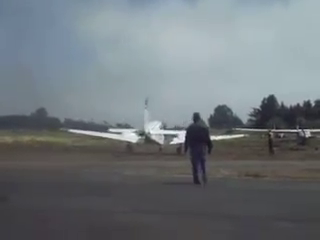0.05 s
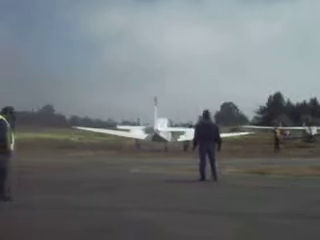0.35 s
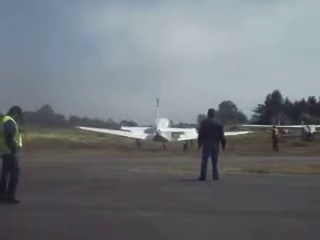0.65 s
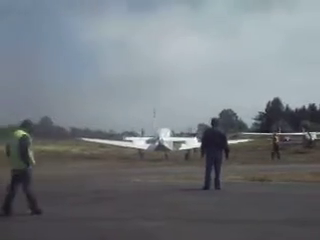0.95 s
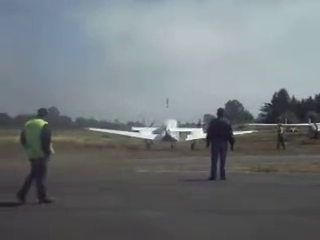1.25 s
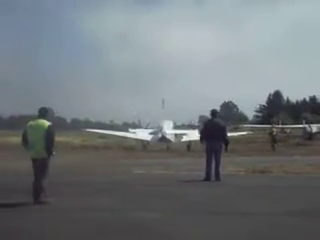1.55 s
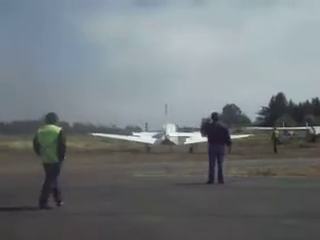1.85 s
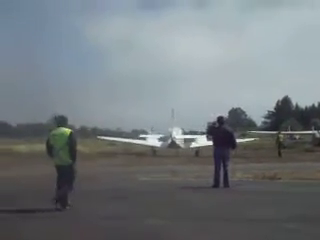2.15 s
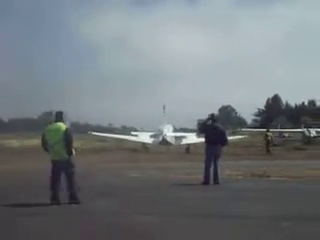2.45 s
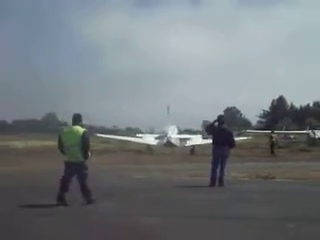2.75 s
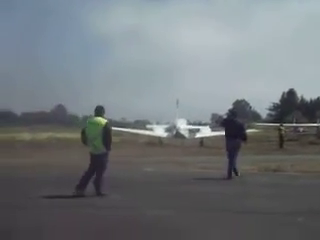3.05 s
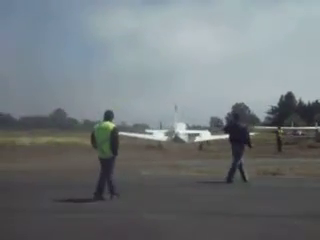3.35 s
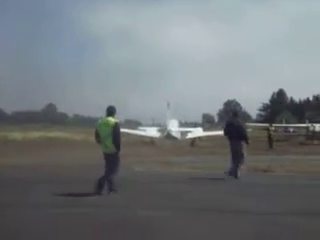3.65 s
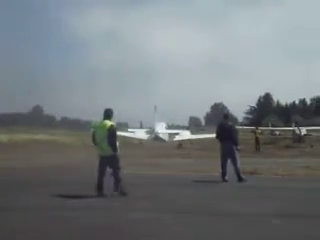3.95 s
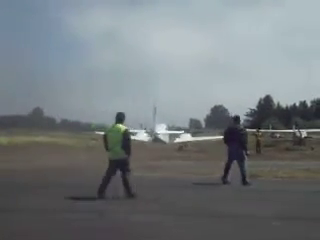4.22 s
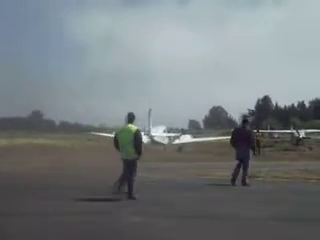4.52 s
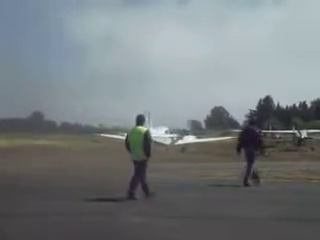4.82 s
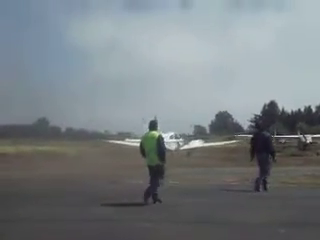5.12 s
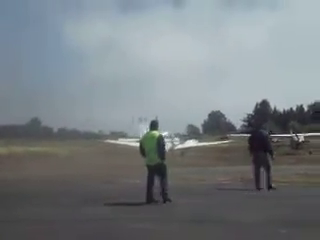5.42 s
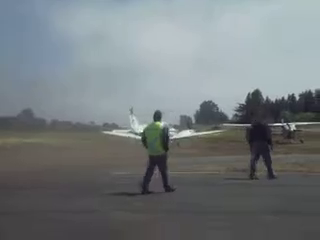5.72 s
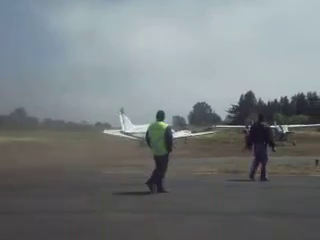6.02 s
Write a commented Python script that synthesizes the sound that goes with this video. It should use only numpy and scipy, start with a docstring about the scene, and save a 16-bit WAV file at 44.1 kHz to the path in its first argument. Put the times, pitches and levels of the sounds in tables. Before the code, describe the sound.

A small twin-engine propeller plane taxis on an airfield apron, heard from behind. Its low, raspy drone first beats in a slow throb. Then one engine climbs in pitch while the other sinks and weakens, and the throb quickens into a flutter. Throughout, propeller wind buffets the small microphone with rumble and short hissing gusts, and blown grit now and then ticks on its case.

```python
"""Two piston aircraft engines, heard from behind in the propeller wash as the plane turns away on an apron.
Nearly equal in speed, they first beat in a slow throb; then the left is opened up and the right
throttled back, so the difference frequency rises and the throb quickens to a flutter.
The exhausts bark and rasp, the turbulent wash buffets a small microphone, and blown grit ticks
on its case, which resonates near 3 kHz."""
import sys
import numpy as np
from scipy import signal
from scipy.fft import rfft, irfft, next_fast_len
from scipy.io import wavfile
from scipy.ndimage import uniform_filter1d

SR = 44100
rng = np.random.default_rng(int(sys.argv[2]) if len(sys.argv) > 2 else 0)


def transcribe(u):
    """Save the signal u as a 16-bit wav file named by the first command-line argument.

    u: samples, shape (n,) or (channels, n), limited to [-1, 1]; the rate is SR.
    q: integer samples, one column per channel.
    """
    v = np.clip(np.atleast_2d(u).T, -1, 1)
    q = np.round(v * 32767).astype(np.int16)
    wavfile.write(sys.argv[1], SR, q)


N = 272538
TIME = np.arange(N) / SR

# Strength of the exhausts towards the microphone. Each row: time in seconds, gain in dB.
EXHAUST_STRENGTH = [(0, -6), (.27, 1.5), (.6, 1.3), (1.3, 2.7), (1.85, 1), (2.3, -3), (4.0, -2.5),
                    (5.0, -2.5), (5.55, 3), (6.18, 2.5)]


def left_engine():
    """The engine that is opened up: pitch rises with speed, and the blade tone swells as the plane turns."""
    # Each row: time in seconds, firing and blade rate in Hz.
    speed = [(0.0, 66.43), (0.48, 65.62), (2.41, 66.08), (3.05, 70.62), (3.2, 70.72), (3.61, 72.94),
             (4.58, 76.37), (4.97, 80.82), (6.18, 91.02)]
    # Blade tone, octave, overtones. Each row: base level in dB, slope in dB per octave of speed.
    laws = [(-12, 4), (-23.5, -5), (-35, -1)]
    # Each row: multiple of the firing rate, relative level in dB.
    overtones = [(1.5, -7.5), (2.5, -5.5), (3, 0), (4, -12), (4.5, -14), (5, -15.5), (6, -13.5), (7, -22)]
    # Each row: time in seconds, gain of the blade tone in dB.
    swell = [(0, 5), (1.6, -4), (2.5, 0), (2.92, -3), (3.4, 4.5), (4.75, 3), (5.12, -6.5), (5.65, 3.5),
             (6.18, 2)]
    return engine(speed, laws, overtones, start_turn=-.06, swell_db=in_time(swell))


def right_engine():
    """The engine that is throttled back: its fundamental falls and weakens as it slows."""
    # Each row: time in seconds, firing and blade rate in Hz.
    speed = [(0.0, 63.95), (1.4, 64.02), (1.73, 63.23), (2.68, 53.46), (2.8, 52.79), (4.08, 49.18),
             (4.39, 49.82), (5.42, 47.3), (6.18, 48.37)]
    # Blade tone, octave, overtones. Each row: base level in dB, slope in dB per octave of speed.
    laws = [(-11, 29), (-19, 8.5), (-29.5, 1.5)]
    # Each row: multiple of the firing rate, relative level in dB.
    overtones = [(.5, -6.5), (1.5, -9), (3, 2), (4, -16.5), (4.5, -7.5), (5, -11), (6, -18.5), (7, -18),
                 (9, -22.5)]
    return engine(speed, laws, overtones, start_turn=.035, swell_db=0)


def engine(speed, laws, overtones, start_turn, swell_db):
    """Phase is the integral of frequency: one phase times the drone, firing pulses and gas noise."""
    hz, taxi_hz = in_time(speed), 65
    turns = start_turn + np.cumsum(hz) / SR
    octaves = np.log2(hz / taxi_hz)
    tone_db, octave_db, upper_db = [db + slope * octaves for db, slope in laws]
    lift_db = 0.47 * in_time(EXHAUST_STRENGTH)   # harmonics share in the exhausts' swing
    tilt_db = 2 * octaves   # faster blades have stronger overtones
    tones = drone(turns, tone_db + swell_db, octave_db + lift_db, upper_db + lift_db, tilt_db, overtones)
    return np.array([tones, firings(turns), puffs(turns)])


def drone(turns, tone_db, octave_db, upper_db, tilt_db, overtones):
    """Blades and firings share one harmonic series; uneven cylinders add half orders."""
    out = from_db(tone_db) * np.sin(2 * np.pi * turns) + from_db(octave_db) * np.sin(4 * np.pi * turns)
    for multiple, db in overtones:
        fading_db = 3 * drift(1.5)   # turbulent air makes each overtone come and go
        amplitude = from_db(upper_db + db + tilt_db * multiple + fading_db)
        out += amplitude * np.sin(2 * np.pi * multiple * turns)
    return np.sqrt(2) * out


def firings(turns, cylinder_db=-3.0, scatter_db=-1.3):
    """An impulse train, one pulse a firing: four cylinders of unequal strength, no two firings alike."""
    at = np.flatnonzero(np.diff(np.floor(turns)) > 0)
    cylinders = np.array([1, -1, 0, -.5])[np.arange(len(at)) % 4]
    pulses = np.zeros(N)
    pulses[at] = from_db(cylinder_db * cylinders + scatter_db * rng.standard_normal(len(at)))
    return rms_one(pulses)


def puffs(turns, depth_db=2.5, second_db=1.0, ragged_db=2.5):
    """Amplitude-modulated noise: turbulent gas puffs out at every firing, and more weakly between."""
    swell_db = depth_db * np.cos(2 * np.pi * turns) + second_db * np.cos(4 * np.pi * turns)
    return rms_one(rng.standard_normal(N) * from_db(swell_db + ragged_db * drift(120)))


def exhaust(pulses, gas, surge_db):
    """Source and filter: firings and gas drive a low bark and a middle rush; gas alone rasps on top."""
    # Three spectra. Each row: frequency in Hz, relative spectral density in dB.
    bark_spectrum = [(50, -17.5), (90, -11), (150, 5), (220, -0.5), (310, -7), (450, -11), (600, -21.5),
                     (900, -39.5)]
    rush_spectrum = [(300, -28), (550, -3), (750, 4), (1080, 8), (1350, 1), (1650, 0), (2000, -18.5)]
    rasp_spectrum = [(1900, -11.5), (2300, -5.5), (2600, 1), (2850, 3.5), (3100, -1), (3350, -8.5),
                     (3900, -13), (4400, -19.5), (5150, -19.5), (5600, -29.5), (6100, -50.5), (6800, -71.5)]
    strength_db = in_time(EXHAUST_STRENGTH)
    # The upper bands fade as the aircraft rolls away.
    rush_db = -34 + .55 * strength_db - 0.4948 * TIME
    rasp_db = -32.5 + .2 * strength_db - 0.29 * TIME
    flicker_db = 0.98 * drift(16)
    bark = from_db(-24 + strength_db) * coloured(gas + from_db(-8) * pulses, bark_spectrum)
    rush = from_db(rush_db) * coloured(gas + from_db(-11) * pulses, rush_spectrum)
    rasp = from_db(rasp_db + surge_db + flicker_db) * coloured(gas, rasp_spectrum)
    return bark + rush + rasp


def wash(rumble_rise_db, hiss_rise_db):
    """Turbulent pressure buffets the microphone, harder as power comes on, and hisses in surges."""
    # Two spectra. Each row: frequency in Hz, relative spectral density in dB.
    buffet_spectrum = [(5, -9), (18, -5.5), (35, -2), (60, -4.5), (100, -3.5), (200, -25)]
    hiss_spectrum = [(900, -1), (1500, 3.5), (2300, 4), (3100, 1), (3900, -25.5), (5200, -23),
                     (6000, -40.5), (6700, -65.5)]
    rumble = coloured(rng.standard_normal(N) * from_db(2 * drift(22)), buffet_spectrum)
    hiss = coloured(rng.standard_normal(N), hiss_spectrum)
    rumble_db = -21 + 0.34 * TIME + rumble_rise_db
    return from_db(rumble_db) * rumble + from_db(-44 + hiss_rise_db) * hiss


def gusts():
    """Gusts and lulls modulate the rumble, hiss and rasp, each along a Gaussian curve in dB."""
    # Each row: centre in seconds, half length in seconds, rises of rumble, hiss and rasp in dB.
    surges = [(.04, 0.087, -12, 17.5, 1.5), (.32, .14, -3.5, -7, 1.5), (1.149, 0.079, -9, -2, 3),
              (1.472, .19, 2, 14, 2), (2.98, .13, 3.5, 13, 2), (4.95, 0.11, 5, 1.5, 2),
              (5.534, 0.14, 6.5, 1.5, 1)]
    return sum(np.outer(rises_db, np.exp(-((TIME - s) / half_s) ** 2)) for s, half_s, *rises_db in surges)


def grit(gain_db=5.5, swell_s=0.00068):
    """Impact excitation: each grain scrapes the case and rings its damped modes for a few cycles."""
    # Each row: start in seconds, relative level in dB, ring pitch in Hz, scrape against ring in dB.
    grains = [(.671, -14, 2700, -41), (.762, -15.5, 2740, -21), (.826, -15, 2700, -36),
              (1.667, -11.5, 2737, -33), (2.0463, -1.5, 2970, -10.5), (2.180, -18, 2820, -21),
              (2.307, -17.5, 2850, -18), (3.188, -18, 3000, -31), (3.206, -13.5, 2930, -20),
              (3.2767, -5.5, 3060, -29), (3.468, -25, 2860, -26), (3.704, -15, 2730, -11),
              (5.298, -1.5, 3050, -13)]
    # Each row: ratio of a mode to the ring pitch, relative level in dB.
    case_modes = [(.55, -26), (1, -2.5), (1.72, -31.5)]
    # Each row: frequency in Hz, relative spectral density in dB.
    scrape_spectrum = [(1000, -10), (1650, 17.5), (2200, 7), (3000, -2.5), (4200, -7), (5200, 3.5),
                       (6200, -39.5)]
    out, t = np.zeros(N), TIME[:SR // 50]
    noise = coloured(rng.standard_normal(N), scrape_spectrum)
    scrapes = noise[:len(grains) * len(t)].reshape(len(grains), -1)
    envelope = (t / swell_s) ** 2 * np.exp(-t / swell_s)
    for (s, db, hz, scrape_db), scrape in zip(grains, scrapes):
        ring = sum(from_db(mode_db) * np.sin(2 * np.pi * ratio * hz * t) for ratio, mode_db in case_modes)
        add(out, s, from_db(db + gain_db) * envelope * (ring + from_db(scrape_db) * scrape))
    return out


def limiter(x, ceiling, release_db_per_s, attack_s):
    """Gain control: the level ducks when the 1 ms average passes the ceiling, then creeps back."""
    crest = np.abs(uniform_filter1d(x, size=SR // 1000, axis=-1))
    over_db = np.maximum(20 * np.log10(crest / ceiling + 1e-9), 0)
    release_db = release_db_per_s * TIME
    held_db = np.maximum.accumulate(over_db + release_db, axis=-1) - release_db
    pole = np.exp(-1 / (attack_s * SR))
    return x * from_db(-signal.lfilter([1 - pole], [1, -pole], held_db))


def overload(x, top, hardness):
    """Saturation: crests flatten at the top, with a narrow rounded knee."""
    return x / (1 + np.abs(x / top) ** hardness) ** (1 / hardness)


def coloured(x, spectrum):
    """Spectral shaping to unit rms, falling 24 dB per octave beyond the spectrum's ends."""
    hz, db = np.transpose(spectrum)
    size = next_fast_len(N)
    octave = np.log2(np.maximum(np.fft.rfftfreq(size, 1 / SR), 1))
    beyond = np.abs(octave - np.clip(octave, np.log2(hz[0]), np.log2(hz[-1])))
    gain = from_db(np.interp(octave, np.log2(hz), db) - 24 * beyond)
    return rms_one(irfft(rfft(x, size) * gain, size)[:N])


def drift(hz):
    """Low-passed noise: a slow random fluctuation of unit rms."""
    step, settle = 40, 2000
    pole = np.exp(-2 * np.pi * hz * step / SR)
    noise = rng.standard_normal(N // step + settle + 2)
    slow = signal.lfilter([1], [1, -2 * pole, pole * pole], noise)[settle:]
    return np.interp(np.arange(N) / step, np.arange(len(slow)), rms_one(slow))


def in_time(curve):
    """Linear interpolation of a curve at every sample."""
    return np.interp(TIME, *np.transpose(curve))


def add(out, s, sound):
    """Superposes a short sound, starting at s seconds."""
    at = int(s * SR)
    out[at:at + len(sound)] += sound[:N - at]


def from_db(db):
    return 10 ** (np.asarray(db) / 20)


def rms_one(x):
    return x / np.sqrt(np.mean(x ** 2) + 1e-20)


def scene():
    """Superposition: the two engines beat at their difference frequency amid the wash and its grit."""
    tones, pulses, gas = left_engine() + right_engine()
    rumble_rise_db, hiss_rise_db, rasp_rise_db = gusts()
    air = wash(rumble_rise_db, hiss_rise_db)
    ticks = grit()
    return (tones + exhaust(pulses, gas, rasp_rise_db) + air + ticks)[None]


def record(dry):
    """Limiting holds the level, the highest crests clip with a faint crackle, a low-pass cuts the top."""
    held = limiter(dry, ceiling=0.62, release_db_per_s=58.5, attack_s=0.0015)
    clipped = overload(held, top=0.727, hardness=75)
    stopband_hz = 15800
    return signal.sosfilt(signal.cheby2(12, 70, stopband_hz, fs=SR, output="sos"), clipped)


dry = scene()
out = record(dry)
transcribe(out)
```